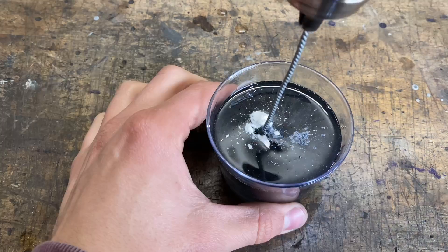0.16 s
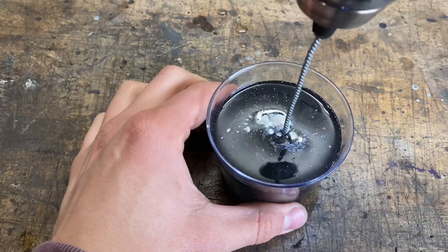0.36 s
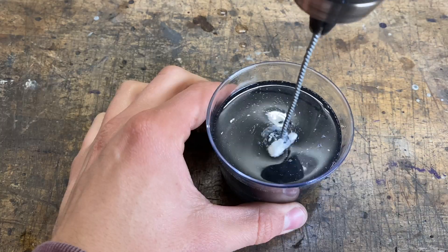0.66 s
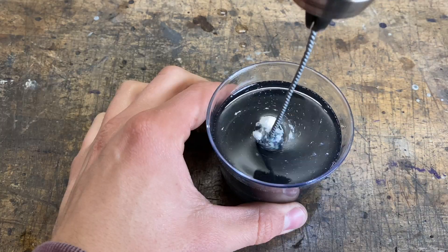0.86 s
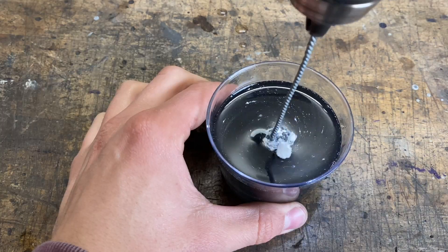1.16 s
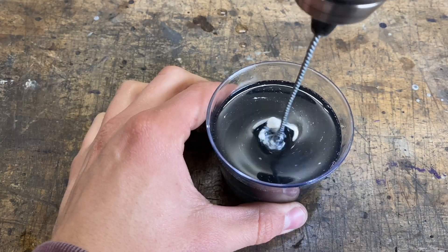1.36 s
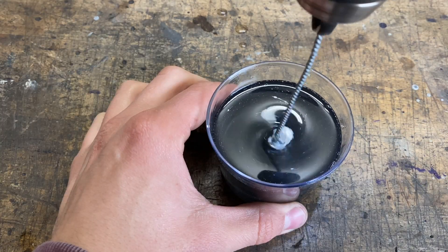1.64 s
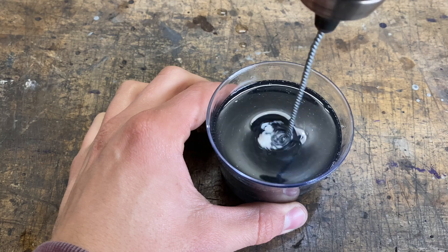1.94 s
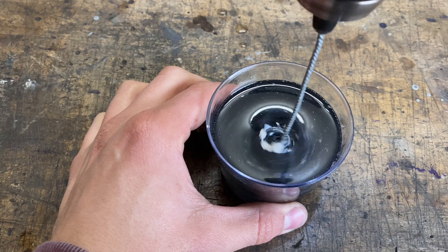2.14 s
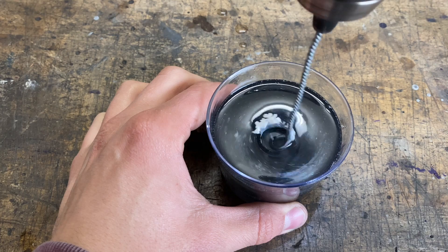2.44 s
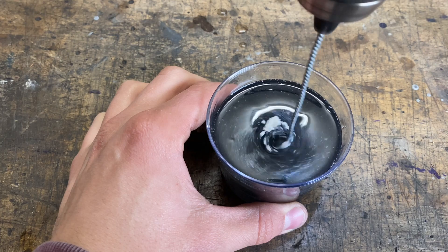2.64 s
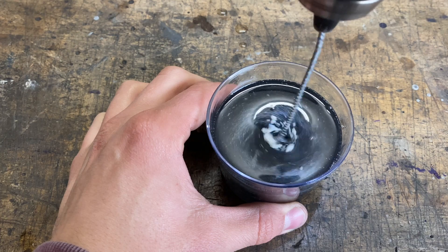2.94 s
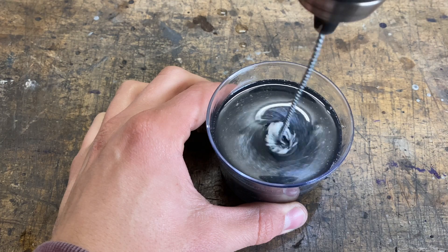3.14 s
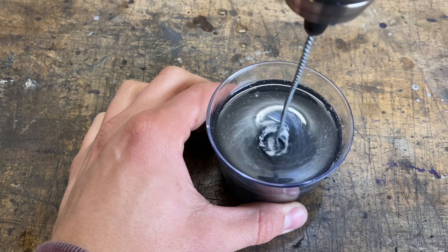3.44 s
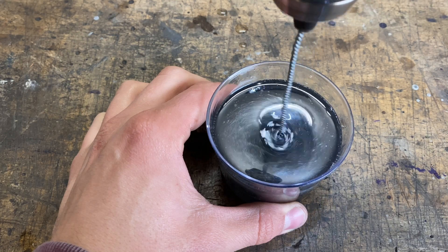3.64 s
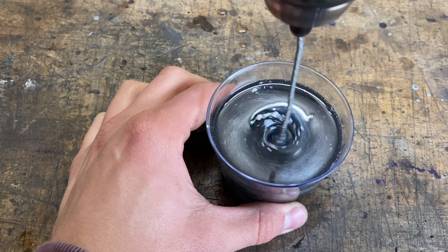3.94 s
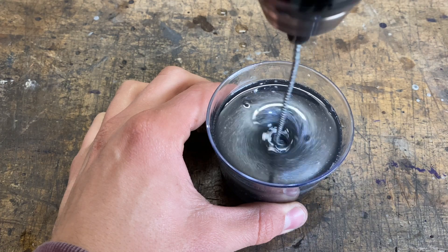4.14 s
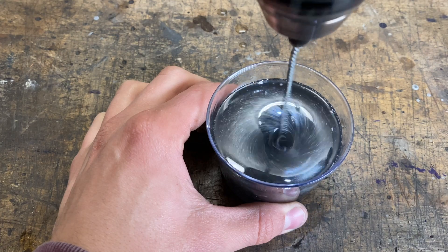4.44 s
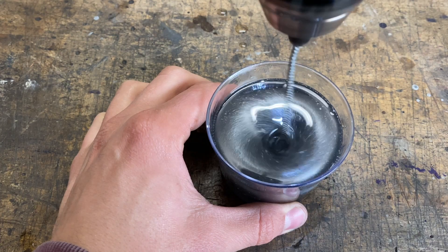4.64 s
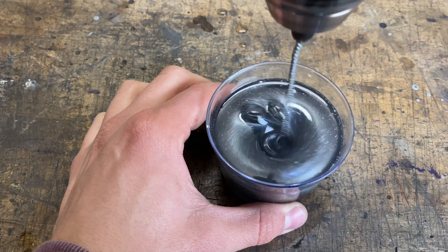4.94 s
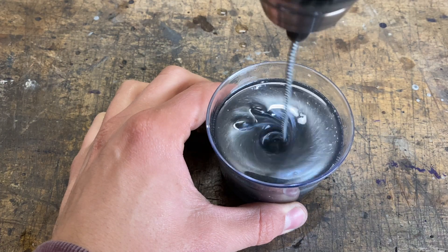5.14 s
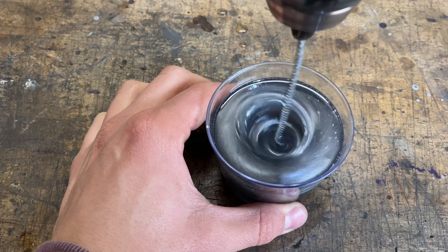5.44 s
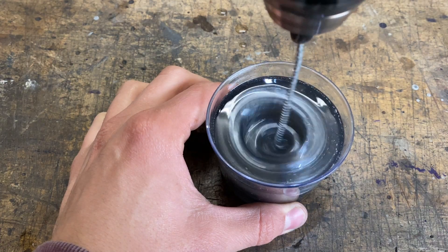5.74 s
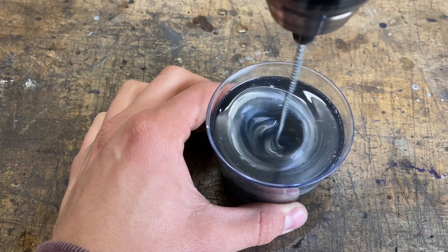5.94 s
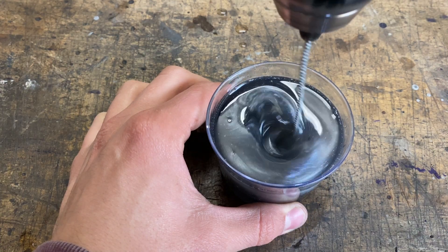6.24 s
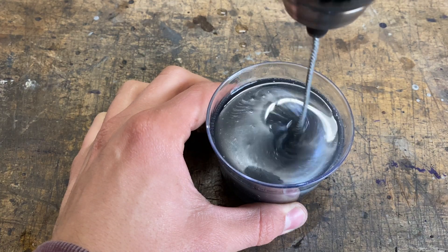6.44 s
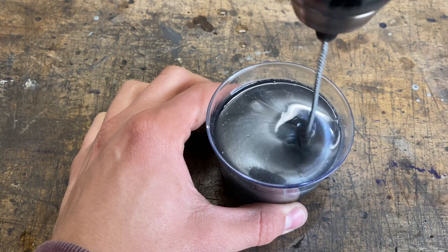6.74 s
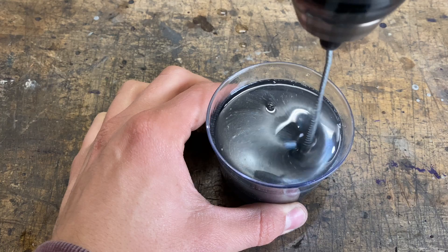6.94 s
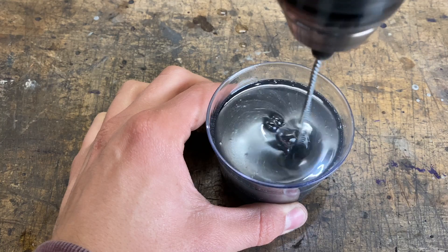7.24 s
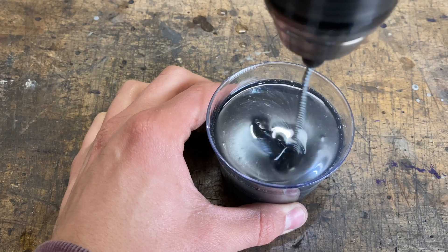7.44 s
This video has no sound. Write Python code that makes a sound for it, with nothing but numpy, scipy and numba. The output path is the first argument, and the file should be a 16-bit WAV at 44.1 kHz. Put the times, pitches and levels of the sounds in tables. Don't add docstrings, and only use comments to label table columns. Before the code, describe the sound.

A tenth of a second of faint room noise dips to silence, then a cordless drill is suddenly running close by. Its low-speed whirr carries a thin, very high electronic whistle. The pitch steps up just after one second and again near two, creeping upward, then leaps at 4.3 seconds with a rasping gear jolt to a loud, piercing whine with airy hiss, held to the end. Close stereo microphone, drill slightly left, dry workshop bench.

```python
import sys
import numpy as np
from scipy import signal
from scipy.fft import rfft, irfft, next_fast_len
from scipy.io import wavfile
from scipy.ndimage import uniform_filter1d
from numba import njit

SR = 44100
rng = np.random.default_rng(int(sys.argv[2]) if len(sys.argv) > 2 else 0)


def persist_wave(psi):
    counts = np.round(np.clip(psi, -1, 1) * 32767).astype(np.int16)
    wavfile.write(sys.argv[1], SR, np.atleast_2d(counts).T)


def invert_db(level):
    return 10 ** (np.asarray(level, dtype=float) / 20)


N = 334719
T = np.arange(N) / SR
PADDED = next_fast_len(N, True)
FREQ = np.arange(PADDED // 2 + 1) * SR / PADDED + 1e-3
STEP = 64
SLOW = np.arange(N // STEP + 2) * STEP / SR
SPEEDS_HZ = [92, 186, 271, 464]


def shaft():
    # t/s, speed gain/Hz, quick lag/s, creeping share/0-1, creep lag/s
    squeezes = [
        (.1, 17.93, .082, .343, 1.277),
        (1.157, 96.73, .0456, .505, .2454),
        (1.9456, 82.86, .1556, .173, .943),
        (4.3223, 189.2, .0198, .286, .0435),
    ]
    start_hz, squeeze_s = 77.66, 0.019
    hz = start_hz
    for t, gain_hz, quick_s, share, creep_s in squeezes:
        age_s = np.maximum(T - t, 0)
        lag = (1 - share) * np.exp(-age_s / quick_s) + share * np.exp(-age_s / creep_s)
        hz = hz + gain_hz * (1 - lag)
    size = int(squeeze_s * SR)
    hz = uniform_filter1d(hz, size, mode="nearest")
    return uniform_filter1d(hz, size, mode="nearest")


def surge_db(t):
    # t/s, hiss/dB, orders/dB, hold/s, release/s
    surges = [
        (1.17, 3.5, -3, .02, .05),
        (4.328, 3, 3, 0.36, 0.22),
    ]
    attack_s = 0.012
    lift_db = 0
    for start_s, hiss_db, orders_db, hold_s, release_s in surges:
        corners_s = np.cumsum([start_s - attack_s, attack_s, hold_s, release_s])
        lift_db = lift_db + np.outer([hiss_db, orders_db], np.interp(t, corners_s, [0, 1, 1, 0]))
    return lift_db


def whine(hz, turns, near_db):
    orders = [.25, 1, 2, 3, 4, 5, 7, 8, 11, 11.5, 12, 13, 14, 16, 17, 20, 22.5, 24, 26, 28, 32, 40, 44, 48]
    settled_db = [(-91, -83, -85, -65.5), (-82, -76, -67.5, -59), (-96, -71, -69, -67.5),
                  (-90, -88, -75, -82.5), (-73.5, -74.5, -59, -55), (-92, -99, -74, -67.5),
                  (-88, -85, -84, -88), (-78, -68, -62.5, -64), (-81, -82, -76, -67),
                  (-75.5, -74, -91, -56), (-72, -58, -66.5, -55), (-84, -60.5, -72, -42.5),
                  (-87, -89, -68.5, -66), (-71.5, -58, -46, -37), (-74.5, -92, -90, -64),
                  (-71, -59.5, -58, -48), (-75, -92, -86, -66), (-74, -69, -67, -72),
                  (-82, -73, -53, -60.5), (-76.5, -58, -59, -75), (-68, -59, -55.5, -67.5),
                  (-68, -53, -76, -88), (-63, -61, -88, -88), (-71, -88, -90, -88)]
    leads = {8: .6, 16: -.5, 20: -.8, 32: .5, 40: .9}
    # f/Hz, half width/Hz, lift/dB
    resonances = [(1253, 374, 17.5), (1364, 33, 7.5), (1430, 25, -11), (2190, 48, 6), (3050, 110, 4),
                  (3530, 686, 17.5), (6030, 130, -6), (6730, 106, -16)]
    swell_depth = [0, .7, .2, .05]
    gear_ratio, chuck_peak_s = 26, 1.705
    torque_db, torque_knee = 3, 140
    tone_near = 0.61

    acceleration = np.abs(np.gradient(hz, SLOW))
    push_db = torque_db * np.log10(1 + acceleration / torque_knee) + surge_db(SLOW)[1]
    chuck_turns = (turns - np.interp(chuck_peak_s, T, turns)) / gear_ratio
    depth = np.interp(T, SLOW, np.interp(hz, SPEEDS_HZ, swell_depth))
    swell = 1 + depth * np.cos(2 * np.pi * chuck_turns)
    out = 0
    for order, row_db in zip(orders, settled_db):
        lift_db = sum(db / (1 + ((order * hz - f) / width) ** 2) for f, width, db in resonances)
        order_db = np.interp(hz, SPEEDS_HZ, row_db) + lift_db + push_db + tone_near * near_db
        line = tone(order * turns, order * hz, order_db, 1.0, leads.get(order, 0.1))
        out = out + line * (swell if order == 20 else 1)
    return out


def chopper(hz, turns, near_db):
    # f/Hz, level/dB
    whistle = [(92, -40), (125, -41.5), (170, -36), (186, -37), (205, -35), (243, -43.5), (271, -48.5)]
    offsets = [-20, -16, -8, 0, 4, 8, -32]
    # level re main whistle/dB at 92, 186, 265 Hz shaft speed
    side_levels = [(-24, -17, -18), (-33, -41.5, -16), (-17, -15, -3.5), (-15, -13, -9.5), (-8, -12, -1),
                   (-21, -23, -41), (-34, -16, -40)]
    chop_hz, full_power_s, stop_s = 9739, 4.325, 0.01
    chop_near = 2.8

    main_db = np.interp(hz, *np.transpose(whistle)) + chop_near * near_db
    out = tone(chop_hz * T - 4 * turns, chop_hz - 4 * hz, main_db, 0.3)
    for order, under_db in zip(offsets, side_levels):
        side_db = main_db + np.interp(hz, [92, 186, 265], under_db)
        out += tone(chop_hz * T + order * turns, chop_hz + order * hz, side_db, 0.9)
    return out * np.clip((full_power_s - T) / stop_s, 0, 1)


def hiss(hz, turns, near_db, right_db):
    colour_speeds = [92, 271, 464]
    # f/Hz, then left, right density/dB per Hz at each colour speed
    air = [(40, -105, -107, -103, -105, -101, -104), (100, -94, -106, -101.5, -102, -97.5, -108),
           (224, -101.5, -99, -92.5, -103, -91.5, -99), (532, -90.5, -88.5, -80, -80, -84, -80),
           (833, -100, -92.5, -83.5, -82.5, -80.5, -85.5), (1070, -89, -87.5, -79, -88, -77.5, -85.5),
           (2300, -85.5, -86, -80.5, -83, -77, -80.5), (2760, -89, -106.5, -84.5, -91, -81.5, -78),
           (3640, -79.5, -82.5, -76, -77, -78, -84), (4950, -87.5, -96, -84.5, -86, -81.5, -84.5),
           (7550, -87.5, -96, -77, -81.5, -73.5, -81), (10050, -83.5, -85.5, -82, -80.5, -82.5, -81.5),
           (11690, -92.5, -100, -86, -89, -84.5, -81), (14700, -99, -99, -92, -89.5, -86.5, -84)]
    trims_db = [5.5, 1.0, -2.6]
    speed_db = [-4.5, -0.5, -1.5, 3.5]
    # delay/s, share/0-1
    echoes = [(0.000971, 0.13), (0.000795, 0.308)]
    notch_hz, notch_width_hz, notch_depth = 11350, 800, 0.55

    throb = 1 + 0.11 * np.cos(2 * np.pi * turns) + 0.14 * np.cos(8 * np.pi * turns)
    noise = port_noise(throb * invert_db(0.55 * walk(14)))
    noise *= [1 + share * np.exp(-2j * np.pi * FREQ * delay_s) for delay_s, share in echoes]
    noise *= 1 - notch_depth * hump(notch_hz, notch_width_hz) ** 2
    columns = np.transpose(air)
    out = 0
    for k, trim_db in enumerate(trims_db):
        ports_db = columns[1 + 2 * k:3 + 2 * k]
        colour = [invert_db(on_log(FREQ, columns[0], db) + trim_db) for db in ports_db]
        share = np.interp(hz, colour_speeds, np.eye(3)[k])
        out = out + share * sound(noise * colour)
    left_db = np.interp(hz, SPEEDS_HZ, speed_db) + near_db + surge_db(T)[0]
    return out * np.sqrt(SR / 2) * invert_db(np.array([left_db, left_db + right_db]))


def slack():
    # t/s, level/dB, f/Hz, width/Hz, decay/s
    rasps = [
        (.14, -43.5, 5810, 900, 0.012),
        (1.19, -65, 5400, 2500, .03),
        (4.325, -34.5, 4030, 3000, 0.0094),
    ]
    lean = invert_db(np.array([[3.0], [-4.0]]))
    out = 0
    for t, db, hz, width_hz, decay_s in rasps:
        age = np.maximum(T - t, 0) / decay_s
        rasp = level(sound(port_noise(1) * hump(hz, width_hz) ** 2), db)
        out = out + np.e * age * np.exp(-age) * rasp * lean
    return out


def workshop():
    # f/Hz, density/dB per Hz
    room = [(18, -36.5), (30, -10), (253, -11), (415, -14), (524, -12), (597, -21), (837, -15),
            (978, -23.5), (10700, -40), (15000, -69)]
    room_db, rumble_db = -56, -72.5
    rumble_hz, rumble_width_hz = 76, 49.4
    lean = invert_db(np.array([[2.2], [-2.2]]))
    colour = invert_db(on_log(FREQ, *np.transpose(room)))
    shop = level(sound(port_noise(invert_db(2.6 * walk(29))) * colour), room_db)
    boom = hump(rumble_hz, rumble_width_hz) ** 2
    rumble = level(sound(port_noise(invert_db(1.92 * walk(2.5))) * boom), rumble_db)
    return lean * shop, lean * rumble


def tone(turns, hz, db, wobble_db, own_lead=0):
    # f/Hz, right minus left/dB, right lead/rad
    beam = [(300, -6, 1.0), (1140, -7.5, 1), (1330, 2, 0.95), (1910, -10.5, 2.5), (2220, -4, -0.04),
            (2620, -4.5, 2), (3800, -5, 1.5), (4430, -17, 1.76), (7360, -43, -2), (8700, -11, 2),
            (9210, -16.5, -3.5), (10700, -1, -1.44), (10200, -6.5, -2.5), (12200, 3, -1.5)]
    beam_hz, beam_db, beam_lead = np.transpose(beam)
    phase = 2 * np.pi * (turns + rng.random())
    left_db = db + wobble_db * walk(7, SLOW)
    right_db = left_db + on_log(hz, beam_hz, beam_db) + 2.2 * walk(3.01, SLOW)
    lead = on_log(hz, beam_hz, beam_lead) + own_lead + 0.22 * walk(1.946, SLOW)
    return sines(phase, np.sqrt(2) * invert_db(left_db), np.sqrt(2) * invert_db(right_db), lead, STEP)


@njit
def sines(phase, left, right, lead, step):
    out = np.empty((2, len(phase)))
    for i in range(len(phase)):
        k = i // step
        u = i / step - k
        left_gain = left[k] + u * (left[k + 1] - left[k])
        right_gain = right[k] + u * (right[k + 1] - right[k])
        right_lead = lead[k] + u * (lead[k + 1] - lead[k])
        out[0, i] = left_gain * np.sin(phase[i])
        out[1, i] = right_gain * np.sin(phase[i] + right_lead)
    return out


def port_noise(gate):
    # f/Hz, likeness/0-1, right lead/rad
    likeness = [(60, 0.9, 0.5), (500, 0.6, 0.9), (1240, 0.8, 1.2848), (2040, 0, -0.5), (3000, 0.82, -2.5),
                (3460, 0.3, -3.5), (4720, 0.3, -1.5), (6000, 0, -8), (6950, 0.54, -8), (8100, 0.8, -8),
                (10500, 0.93, -9.5), (11200, 0.5, -8.5), (12720, .97, -13), (15900, 1, -11)]
    hz, like, lead = np.transpose(likeness)
    a, b = rfft(gate * rng.standard_normal((2, N)), PADDED)
    like = np.clip(on_log(FREQ, hz, like), 0, 1)
    turned = np.exp(1j * on_log(FREQ, hz, lead)) * a
    return np.array([a, like * turned + np.sqrt(1 - like ** 2) * b])


def sound(spectra):
    return irfft(spectra, PADDED)[:, :N]


def hump(hz, width_hz):
    return 1 / np.sqrt(1 + ((FREQ - hz ** 2 / FREQ) / width_hz) ** 2)


def on_log(hz, table_hz, values):
    return np.interp(np.log(np.abs(hz) + 1e-9), np.log(table_hz), values)


def walk(rate_hz, t=T):
    points = np.repeat(rng.standard_normal(int(T[-1] * rate_hz) + 2), 4)
    points = uniform_filter1d(points, 4)
    return 1.2 * np.interp(t * rate_hz * 4, np.arange(len(points)), points)


def level(x, db):
    return x * invert_db(db) / np.sqrt(np.mean(x ** 2))


def scene():
    # t/s, nearer/dB, hiss right minus left/dB
    hand = [(.14, .5, -1), (.5, 0.5, -1.5), (1.0, 0, 1), (1.25, 0.5, -2), (2.0, -0.5, -3), (3.3, 0, -2.5),
            (3.6, 1, -4.5), (4.2, 1, -5), (4.8, 0, -4), (7.0, 0, -2.5), (7.59, 0.5, -3.5)]
    t, near_db, right_db = np.transpose(hand)
    hz = shaft()
    turns = np.cumsum(hz) / SR
    slow_hz, slow_near_db = np.interp(SLOW, T, hz), np.interp(SLOW, t, near_db)
    drill = whine(slow_hz, turns, slow_near_db)
    drill += chopper(slow_hz, turns, slow_near_db)
    drill += hiss(hz, turns, np.interp(T, t, near_db), np.interp(T, t, right_db))
    drill += slack()
    shop, rumble = workshop()
    rumble = rumble * invert_db(np.interp(hz, [271, 464], [0, -5.0]))
    fade_out = np.interp(T, (0.1, 0.127), [1, 0])
    fade_in = np.interp(T, (0.126, 0.148), [0, 1])
    return shop * fade_out + (drill + rumble) * fade_in


def low_pass(x):
    return signal.sosfilt(signal.butter(12, 16840, fs=SR, output="sos"), x)


def record(dry):
    bass_hz, top_hz = 38, 15700
    mic = signal.sosfilt(signal.butter(3, bass_hz, "high", fs=SR, output="sos"), dry)
    cut = signal.sosfilt(signal.ellip(14, 0.2, 90, top_hz, fs=SR, output="sos"), mic)
    return low_pass(cut)


dry = scene()
out = record(dry)
persist_wave(out)
```